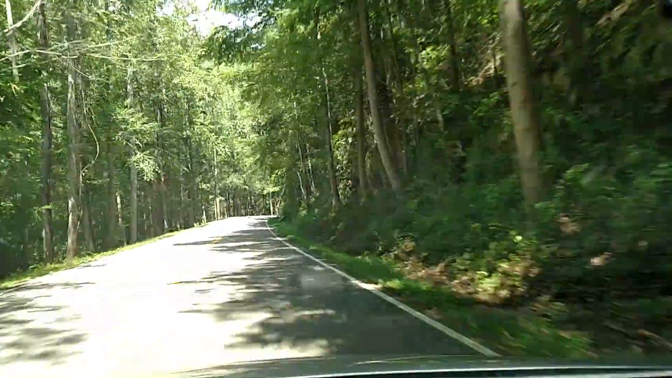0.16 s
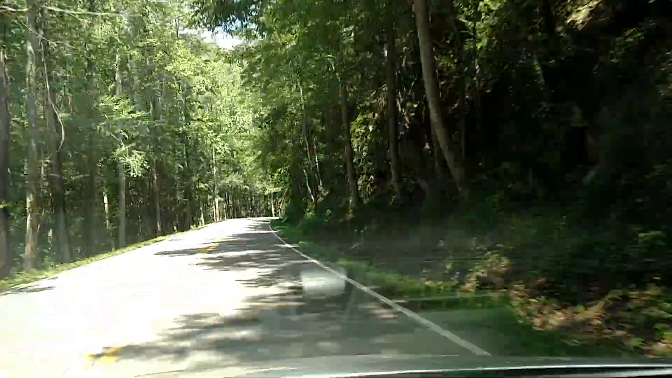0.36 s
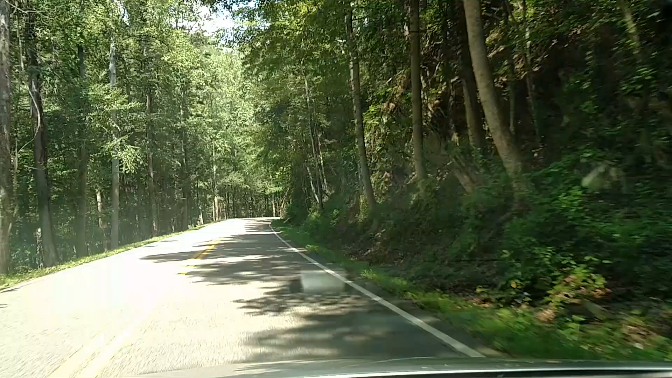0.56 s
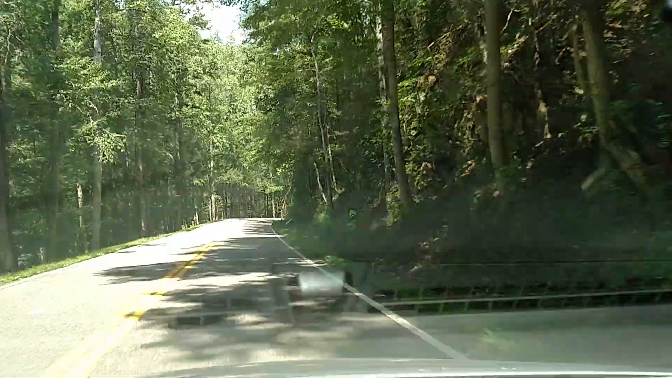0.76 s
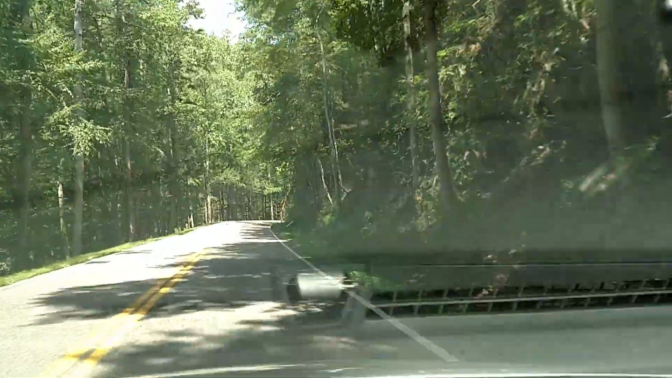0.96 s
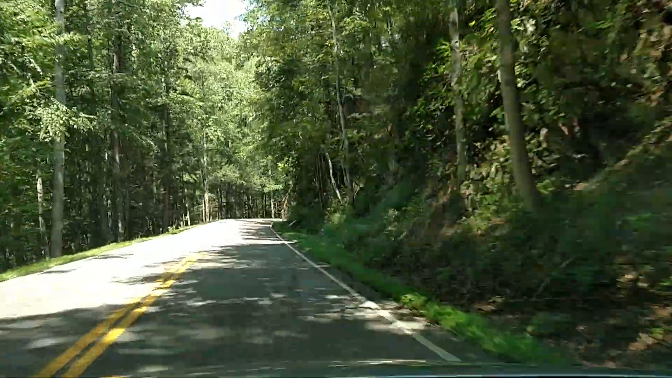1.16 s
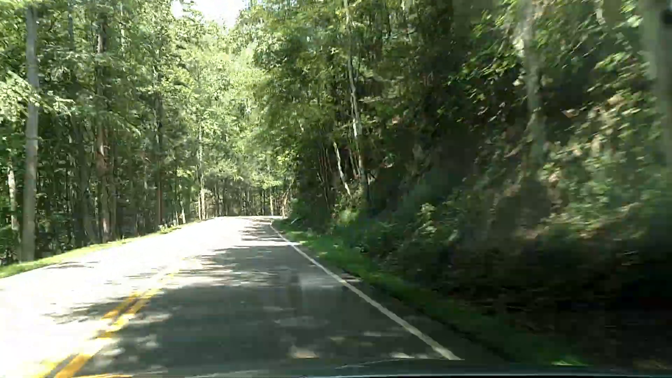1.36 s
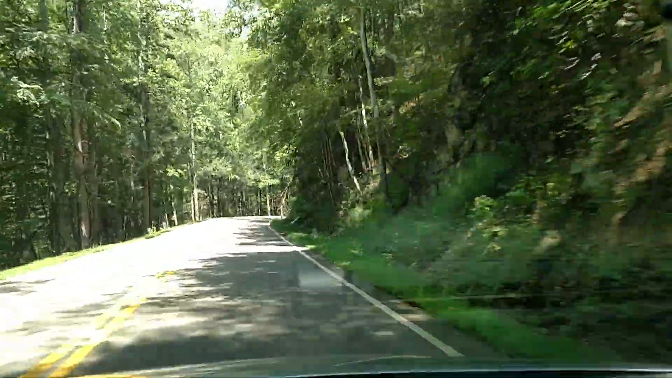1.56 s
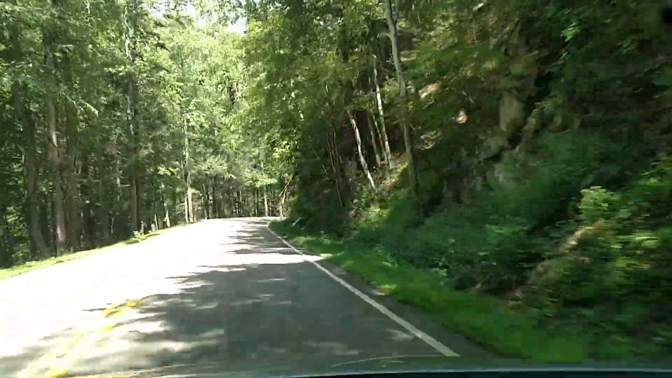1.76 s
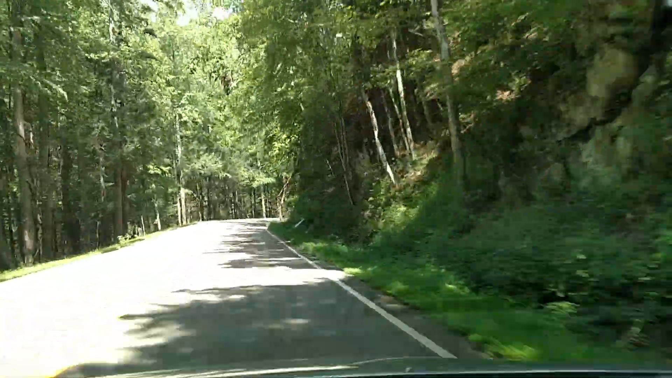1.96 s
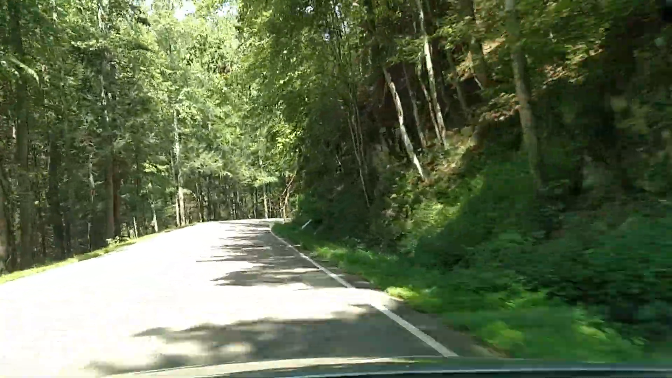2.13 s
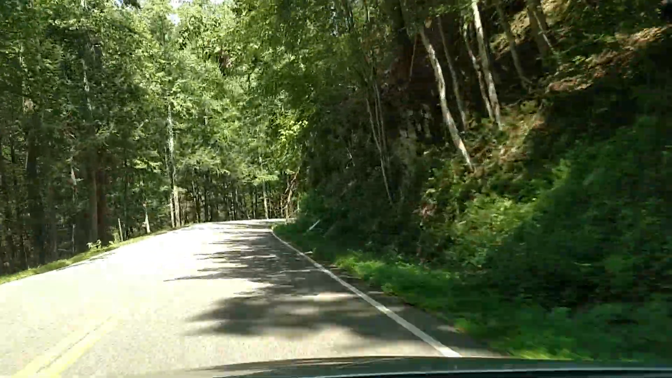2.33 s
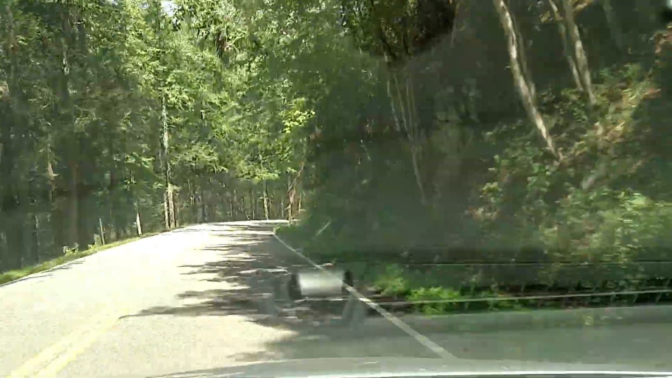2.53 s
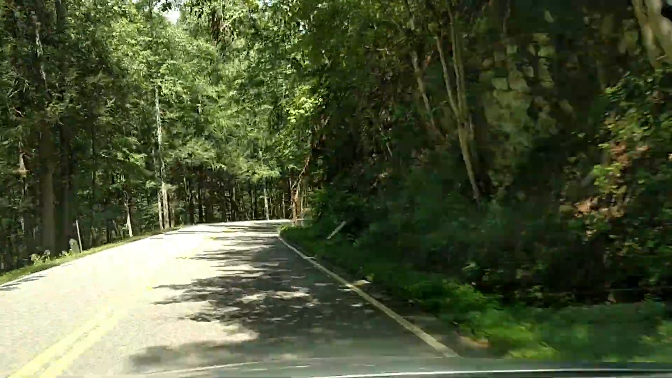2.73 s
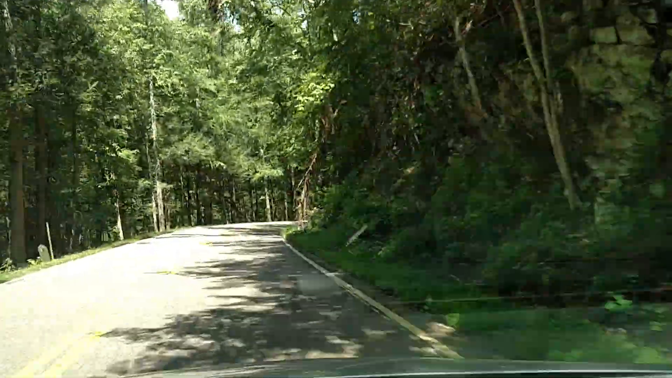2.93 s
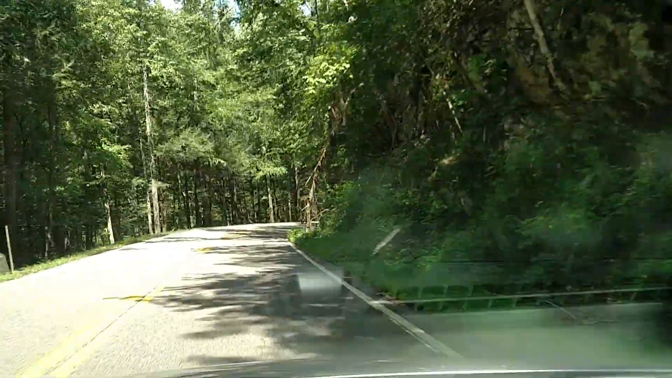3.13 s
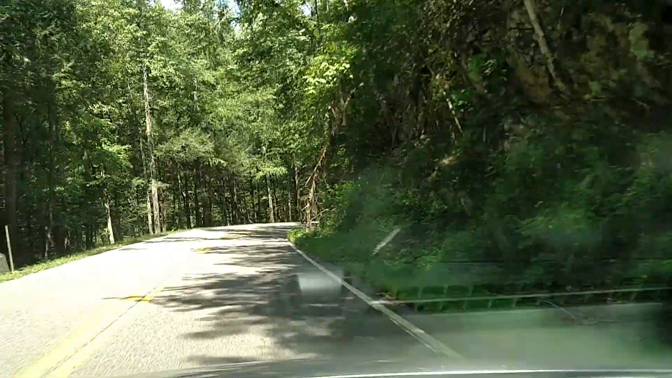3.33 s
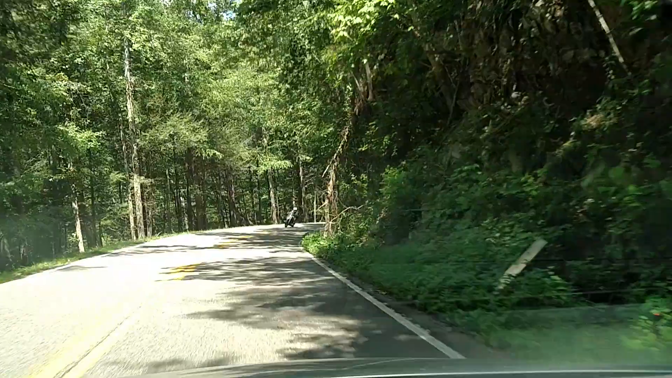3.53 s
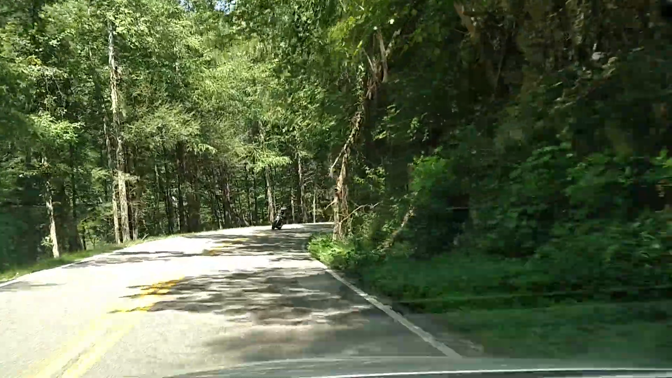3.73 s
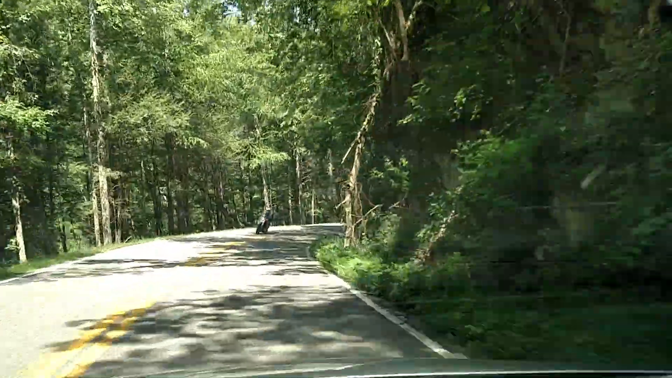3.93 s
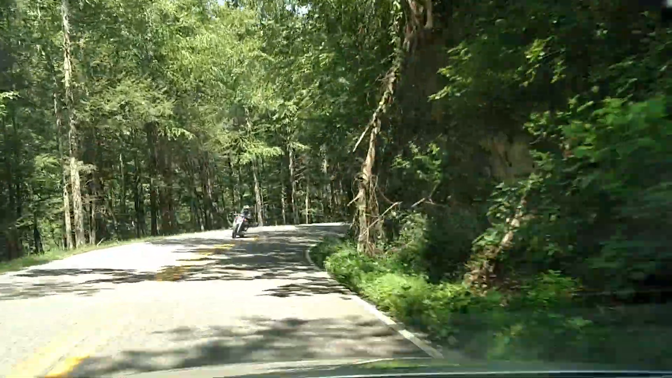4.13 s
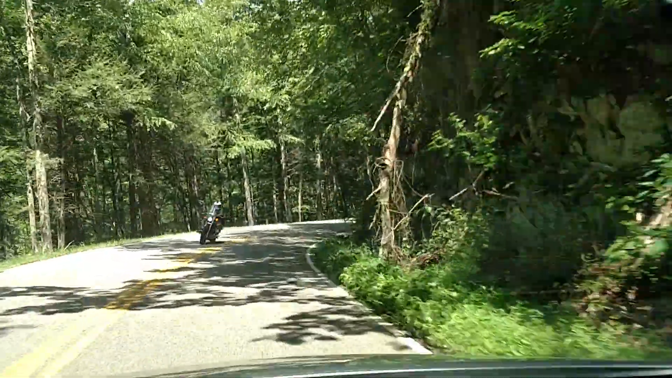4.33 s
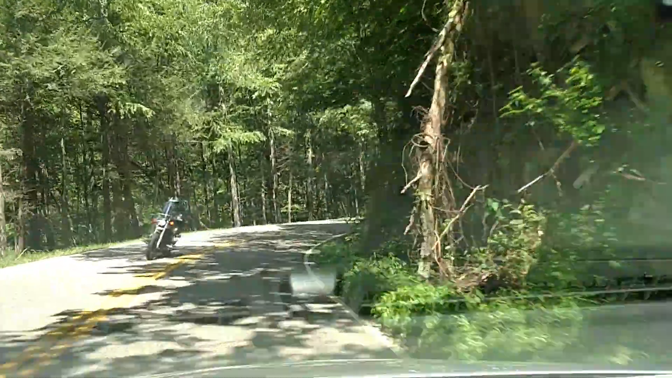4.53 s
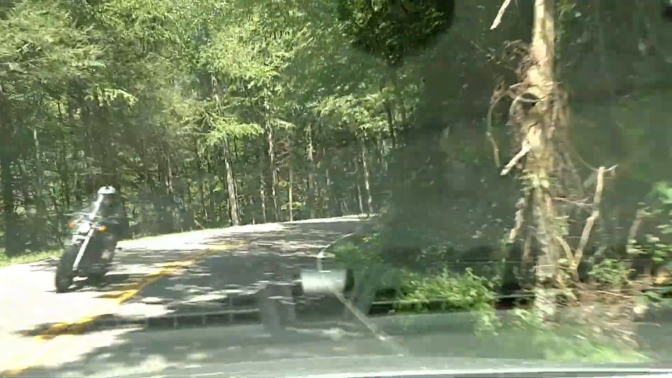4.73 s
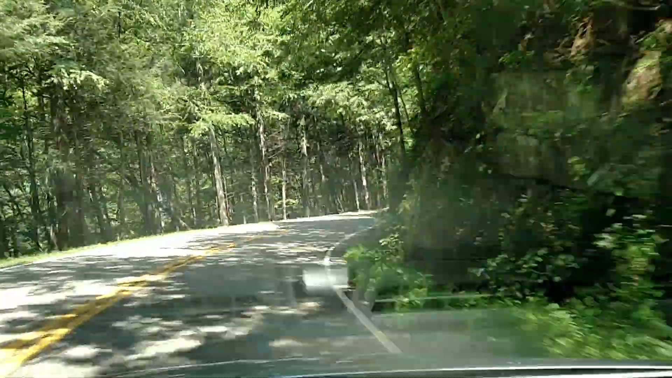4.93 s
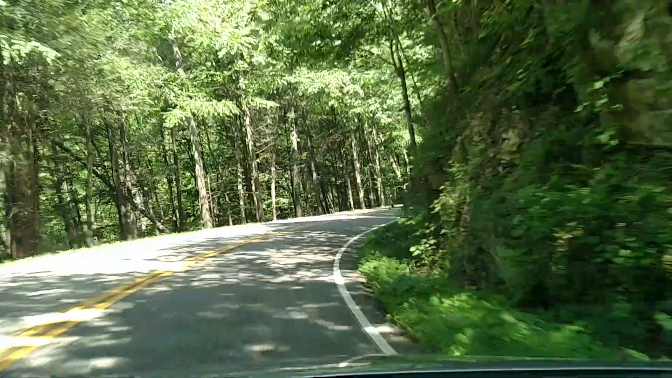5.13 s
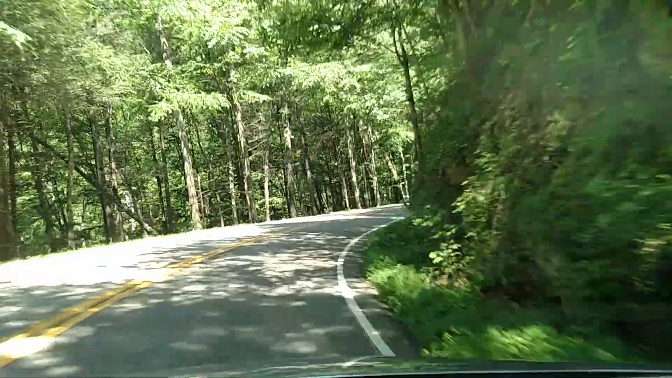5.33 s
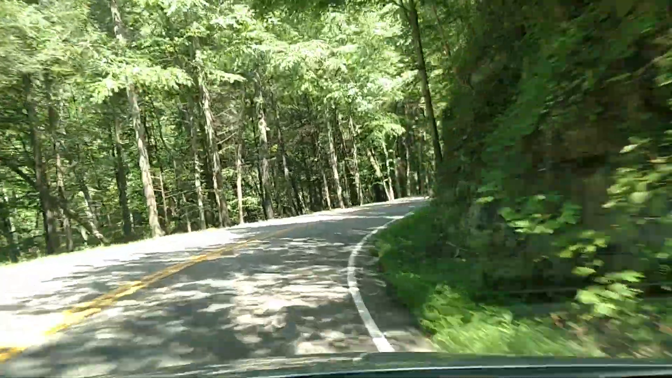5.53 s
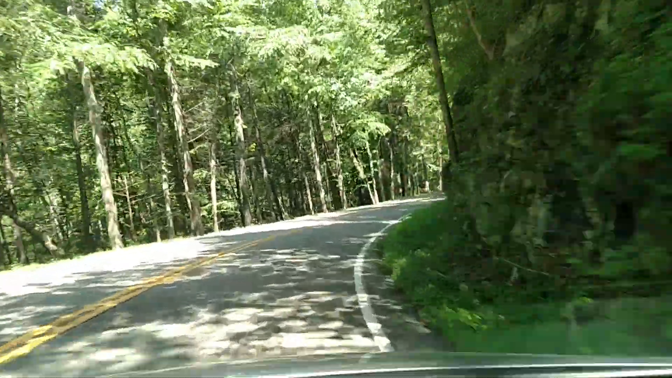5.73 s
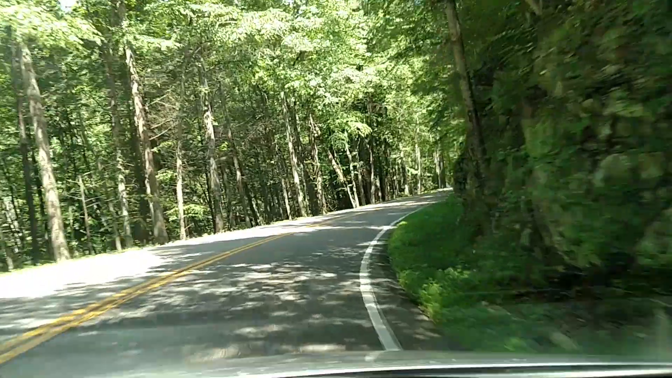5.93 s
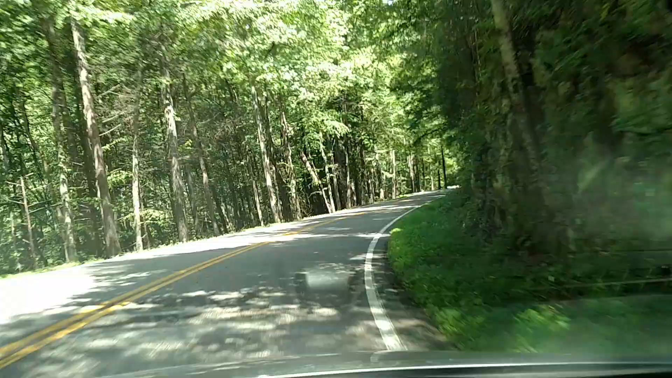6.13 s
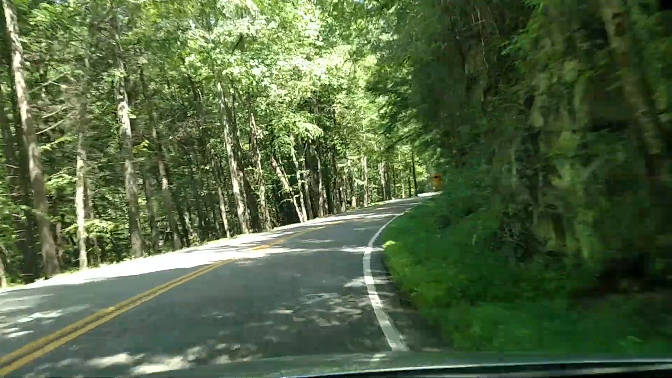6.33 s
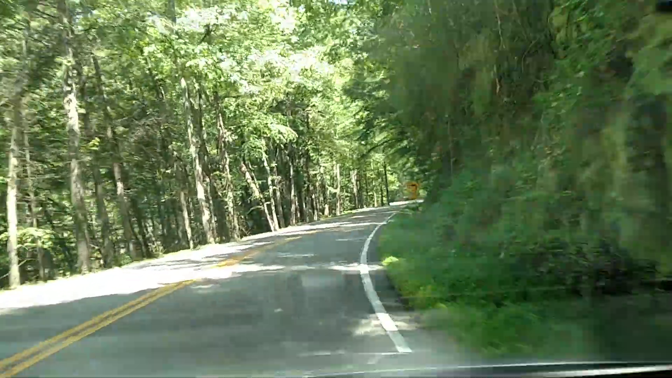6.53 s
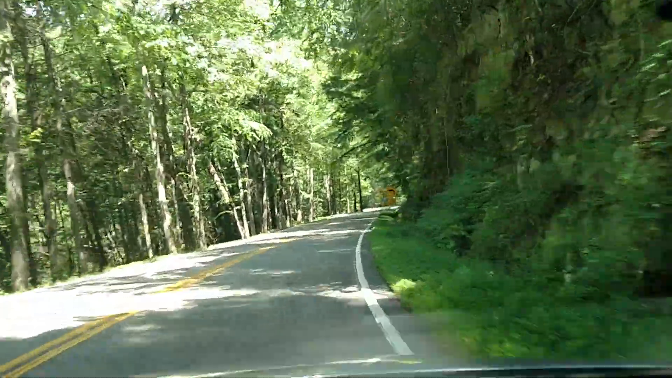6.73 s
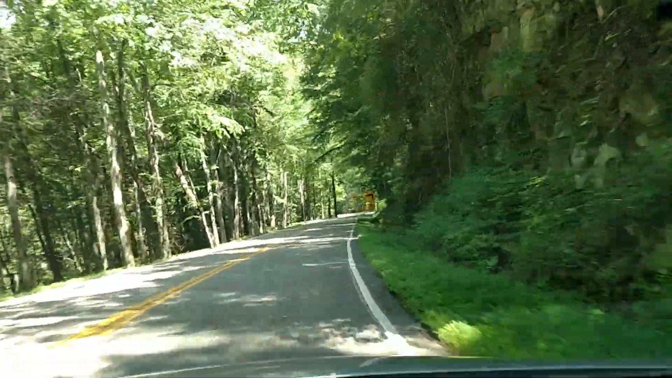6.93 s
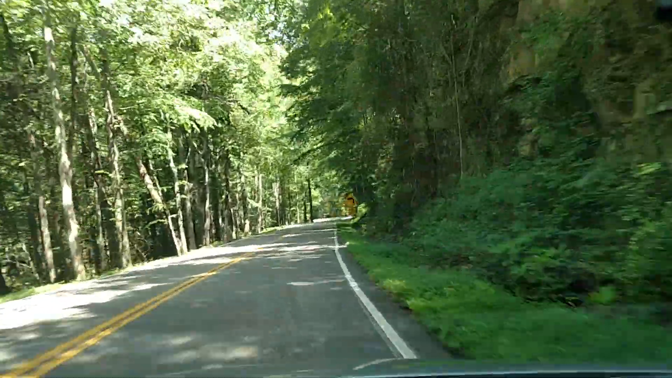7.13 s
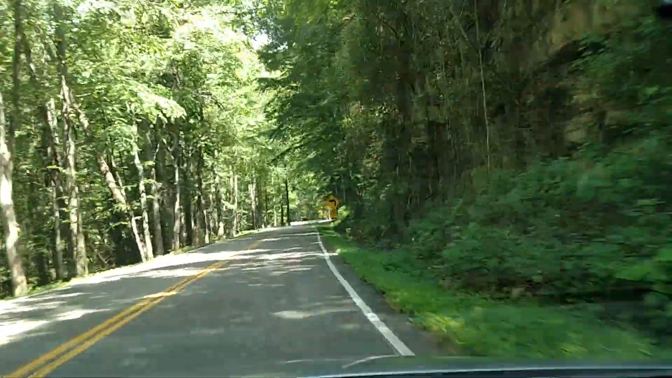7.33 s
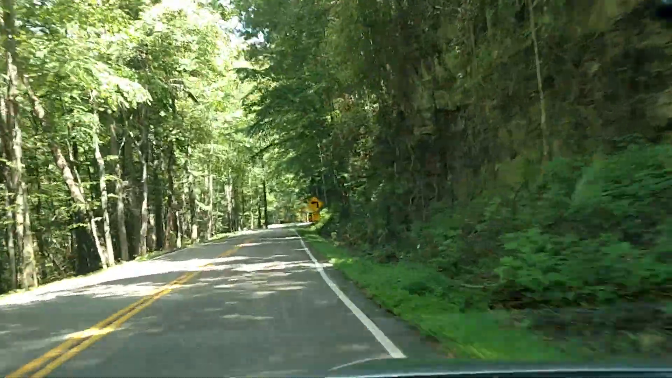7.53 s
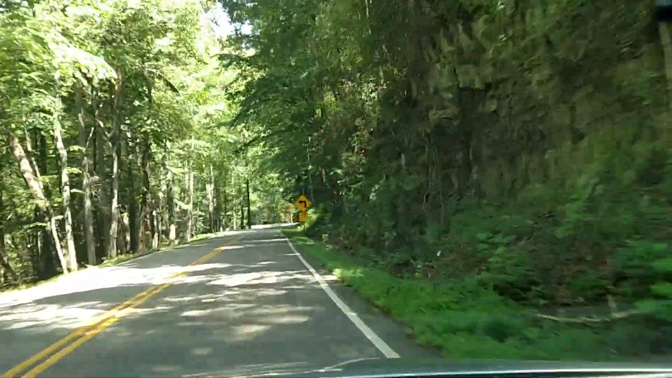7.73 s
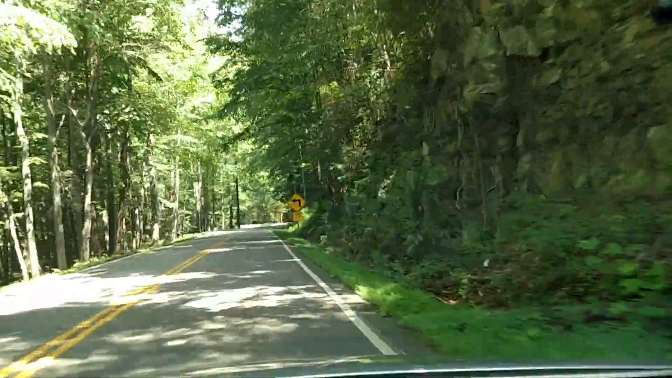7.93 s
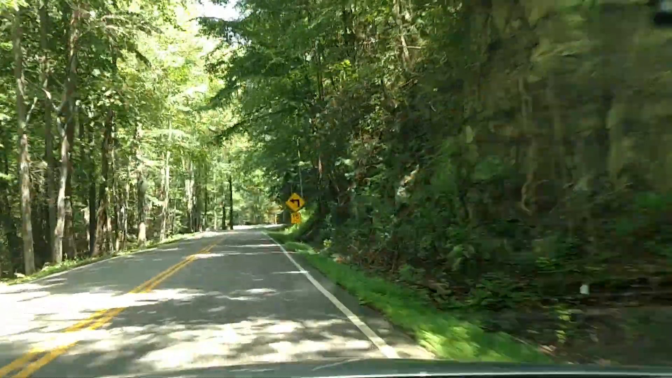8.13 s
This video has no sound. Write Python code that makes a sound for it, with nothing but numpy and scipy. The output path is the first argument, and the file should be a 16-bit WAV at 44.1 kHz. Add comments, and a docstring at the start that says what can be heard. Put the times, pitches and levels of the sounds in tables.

```python
"""A twin-cylinder motorcycle booms ahead, then barks past a car window with falling pitch on a winding road.
Its exhaust is a sum of cycle-rate orders plus ringing blasts; noise makes its whoosh and escaping gas.
Inside the car, a firing tone drones in the cabin, and shaped noises make road rumble, tyre roar and rushing air.
A limiter turns the gain down at loud peaks, so the road noise sinks and then swells back."""
import sys
import numpy as np
from scipy import signal
from scipy.fft import rfft, irfft
from scipy.io import wavfile
from scipy.ndimage import uniform_filter1d, minimum_filter1d

SR = 44100
rng = np.random.default_rng(int(sys.argv[2]) if len(sys.argv) > 2 else 0)


def bounce(signal):
    """Save signal as a 16-bit WAV file at the path given by the first command-line argument."""
    frames = np.transpose(np.atleast_2d(signal))
    limited = np.clip(frames, -1, 1)
    pcm = np.round(limited * 32767).astype(np.int16)
    wavfile.write(sys.argv[1], SR, pcm)


N = 360291
TIME = np.arange(N) / SR  # s

# path: closing speed m/s, least gap m, moment of meeting s
CLOSING, GAP, MEETING = 23, 1.5, 5.135
# moment of one firing s, lag of the second cylinder in cycles
FIRING, SECOND_CYLINDER = 5.1432, .415
SOUND_SPEED = 343  # m/s

# four-stroke cycle rate of the motorcycle: t/s, f/Hz
CYCLE_RATE = [(3.5, 20.2), (4.44, 20.62), (4.8, 20.95), (5, 21.12), (5.3, 21.05), (6.5, 21)]


def cycles_heard():
    """Doppler effect: a changing travel time lowers the cycle rate heard as the motorcycle passes."""
    rate_hz, = follow(CYCLE_RATE)
    cycles = np.cumsum(rate_hz) / SR
    cycles -= np.interp(FIRING, TIME, cycles)
    arrival = TIME + distance() / SOUND_SPEED
    return np.interp(TIME, arrival, cycles)


# exhaust boom heard from ahead: multiple of the cycle rate, relative level/dB
AHEAD_ORDERS = [(4, -20), (5, -13), (6, 0), (7, -12), (9, -29), (11, -23), (15, -22), (16, -28), (17, -21),
                (20, -35)]
# exhaust boom heard from behind: multiple of the cycle rate, relative level/dB
BEHIND_ORDERS = [(5, -4.5), (6, -2), (7, -6), (9, -8.5), (10, -5.5), (11, -0.5), (12, -4), (14, -5),
                 (15, -15)]
# radiation of each boom: level/dB at the gap on the beam axis, power of the fall with distance, power of the beam
AHEAD_RADIATION = (-0.7, .68, .7)
BEHIND_RADIATION = (-8.5, 0.55, 1.8)


def motorcycle_boom(cycles, orders, gain, rough, fading_db):
    """Harmonic synthesis: uneven combustion roughens the exhaust orders and reflections fade each separately."""
    cycles = cycles + .002 * wander(rate_hz=15)
    tone = 0
    for order, db in orders:
        level = gain_of(db + fading_db * wander(rate_hz=4.2))
        tone = tone + level * np.cos(2 * np.pi * (order * cycles + rng.random()))
    combustion = 1 + rough * wander(rate_hz=25)
    return evened(tone) * combustion * gain


# ring of pipes and cabin after each blast: f/Hz, width/Hz, relative level/dB
PIPE_MODES = [(139, 26, -3), (206, 45, 1), (238.2, 38, 2.5), (342, 37, -2.5), (392, 55, -6.5),
              (620, 130, -12.5), (683, 33, -19), (880, 33, -23.5), (1095, 110, -21)]
# radiation of the blasts: level/dB at the gap on the beam axis, power of the fall with distance, power of the beam
BARK_RADIATION = (9.7, 1.2, .75)
# this far behind, the car's own body screens the pipes: distance m, softness m, drop dB
SCREEN_M, SCREEN_EDGE_M, SCREEN_DB = 5, .5, -16


def motorcycle_bark(cycles, uneven_db=1.2, muffle_hz=1500, thump=1.0, thump_hz=210):
    """Impulse response: two unevenly spaced firings a cycle each set off a pressure thump and damped modes."""
    fired = 0
    for count in (cycles, cycles - SECOND_CYLINDER):
        whole = np.floor(count)
        fired = fired + np.diff(whole, prepend=whole[0])  # one impulse per completed cycle
    screened_db = SCREEN_DB * beyond(past(), SCREEN_M, SCREEN_EDGE_M)
    blast_db = screened_db + uneven_db * rng.standard_normal(N)
    fired = fired * carried(BARK_RADIATION, backwards=True) * gain_of(blast_db)

    t = TIME[:SR // 10]
    ring = 0
    for k, (hz, width, db) in enumerate(PIPE_MODES):
        decay = np.exp(-np.pi * width * t)
        ring = ring + (-1) ** k * gain_of(db) * decay * np.sin(2 * np.pi * hz * t)
    ring = signal.sosfilt(signal.butter(2, muffle_hz, fs=SR, output="sos"), ring)
    u = np.pi * (thump_hz * t - 1)
    pressure = (2 * u ** 2 - 1) * np.exp(-u ** 2)
    blast = ring / abs(ring).max() + thump * pressure
    return signal.oaconvolve(fired, blast / abs(blast).max())[:N]


def cabin_echo(x, share=0.53, t60=0.18):
    """Reverberation: glass and trim return sparse reflections that fall by 60 dB in t60 seconds."""
    t = TIME[:SR // 5]
    struck = rng.random(len(t)) < 2000 / SR  # about 2000 reflections a second
    taps = rng.standard_normal(len(t)) * struck * (t > .003) * gain_of(-60 * t / t60)
    return x + share * signal.oaconvolve(x, taps / np.linalg.norm(taps))[:N]


# spectrum of the escaping gas: f/Hz, relative level/dB per Hz
GAS_SPECTRUM = [(600, -11.5), (1300, 3), (2600, -5), (3700, 1.5), (4700, -1.5), (5700, 0.5), (6200, -3.5),
                (7000, 2.5), (8200, -6.5), (10000, -13.5), (15000, -22)]
# cracks of the closest blasts: t/s, level/dB, resonance f/Hz
GAS_CRACKS = [(5.102, -38.5, 6450), (5.123, -40, 2400), (5.1482, -32, 5960), (5.166, -32.5, 5070),
              (5.197, -28.5, 3850), (5.216, -28, 7000), (5.267, -39.5, 5600), (5.3182, -40.5, 5500)]


def motorcycle_cracks(rise_s=0.0013, whistle=0.95, width_hz=600):
    """Jet noise: millisecond puffs of turbulent gas, each exciting a brief resonance at its own pitch."""
    jet, out = noise(GAS_SPECTRUM), np.zeros(N)
    t = TIME[:SR // 20]
    envelope = t / rise_s * np.exp(1 - t / rise_s)
    for s, db, hz in GAS_CRACKS:
        start = round(s * SR)
        span = slice(start, start + len(t))
        puff = jet[span] * envelope
        ringing = signal.lfilter(*signal.iirpeak(hz, hz / width_hz, SR), puff)
        out[span] += gain_of(db) * (puff + whistle * ringing)
    return out


# motorcycle's tyres, chain and wind: f/Hz, relative level/dB per Hz
WHOOSH_SPECTRUM = [(300, 10), (700, 12), (1150, 1), (1500, -4.5), (2400, -7.5), (3500, -16.5),
                   (5500, -20.5), (7200, -19.5), (10000, -35), (15000, -43.5)]


def motorcycle_whoosh(cycles, level_db=-27, falloff=1.2, rasp=0.18):
    """Amplitude modulation: running noise rasps once a crank turn and obeys a power law of distance."""
    throb = 1 + rasp * np.cos(4 * np.pi * cycles - 1)  # two crank turns a cycle
    return noise(WHOOSH_SPECTRUM) * throb * gain_of(level_db) * (GAP / distance()) ** falloff


def past():
    """Uniform motion: metres the motorcycle has passed the car by, negative on approach."""
    return CLOSING * (TIME - MEETING)


def distance():
    """Right-angled geometry: metres between the motorcycle and the car."""
    return np.hypot(GAP, past())


# the bend hides the motorcycle beyond a sight line: a quick drop, then more with every metre
SIGHT_M, SIGHT_EDGE_M, HIDDEN_DB, HIDDEN_DB_PER_M = 17, 0.47, -6, -0.2985


def carried(radiation, backwards):
    """Directivity and spreading: gain by angle and distance, with the acoustic shadow of the bend."""
    level_db, spread, beam = radiation
    metres = distance()
    along = past() if backwards else -past()
    facing = .5 + .5 * along / metres  # 1 on the beam axis, 0 opposite
    hidden_m = np.maximum(metres - SIGHT_M, 0)
    shadow_db = HIDDEN_DB * beyond(metres, SIGHT_M, SIGHT_EDGE_M) + HIDDEN_DB_PER_M * hidden_m
    return gain_of(level_db + shadow_db) * (GAP / metres) ** spread * facing ** beam


# the car's firing rate, sagging as the throttle eases: t/s, f/Hz
FIRING_RATE = [(0, 107.3), (.17, 109.7), (.7, 108), (1.6, 106.9), (2.3, 105.3), (2.9, 101), (3.4, 98.6),
               (4.25, 90.33), (4.8, 86.5)]
# the cabin booms when the firing rate is near its resonance
CABIN_HZ, CABIN_WIDTH_HZ, RESONANT_DB, OFF_RESONANCE_DB = 108.74, 3.5, -15.5, -26
# the drone dies away late in the bend: moment, softness, drop
FADE_S, FADE_EDGE_S, FADE_DB = 6.95, 0.11, -12.5


def car_engine(second_db=-21, third_db=-26, waver_db=1.5):
    """Forced resonance: the firing tone and faint overtones weaken as it slides off the cabin mode."""
    hz, = follow(FIRING_RATE)
    wavering_hz = hz * (1 + 0.0041 * wander(rate_hz=5.1))
    angle = 2 * np.pi * np.cumsum(wavering_hz) / SR
    tone = np.sin(angle) + gain_of(second_db) * np.sin(2 * angle) + gain_of(third_db) * np.sin(3 * angle)
    resonant = gain_of(RESONANT_DB) / np.hypot(1, 2 * (hz - CABIN_HZ) / CABIN_WIDTH_HZ)
    boom = np.hypot(resonant, gain_of(OFF_RESONANCE_DB))
    fade = gain_of(FADE_DB * beyond(TIME, FADE_S, FADE_EDGE_S))
    return evened(tone) * boom * fade * gain_of(waver_db * wander(rate_hz=3.5))


# shaking body, drumming cabin, roaring tread: f/Hz, relative level/dB per Hz
SHAKE_SPECTRUM = [(4, -16), (10, -6), (18, -6), (25, -1), (31, 1), (42, -2), (55, -8), (80, -14),
                  (130, -35)]
DRUM_SPECTRUM = [(50, -24), (72, -3.5), (92, -3.5), (108, 4), (125, 4), (150, -0.5), (166, -7.5),
                 (186, 1.5), (212, -6.5), (245, -6), (285, -10), (340, -11), (430, -17), (520, -18),
                 (680, -29), (1000, -42.5)]
ROAR_SPECTRUM = [(300, -23.5), (520, -6.5), (650, -11.5), (760, -10.5), (850, -11), (1170, -11.5),
                 (1450, -21), (2000, -28), (3000, -40), (4000, -45.5), (5300, -52), (7000, -47.5),
                 (9000, -57), (15000, -71)]
# stretches of coarse asphalt: t/s, length/s, extra level/dB
COARSE_STRETCHES = [(.11, 0.1, 2), (1.226, 0.2, 2.5), (1.564, .12, 4.5), (2.843, 0.16, 3),
                    (3.904, 0.091, 2), (6.68, 0.094, 2), (7.04, 0.15, 1.5)]
# levels on the straight
SHAKE_DB, DRUM_DB, ROAR_DB = -20, -20.5, -41.5
# entering the bend, the body shakes less and the loaded tyres boom
BEND_S, BEND_EDGE_S, BEND_SHAKE_DB, TYRE_BOOM_DB = 3.5, 0.2, -2.5, -24
# the tyres work harder through the curve, most at its apex
APEX_S, LOAD_RISE_S, LOAD_FALL_S, LOAD_DRUM_DB, LOAD_ROAR_DB = 6.95, 1.0, .7, 3, 7.5


def road(grain_db=1.0, drift_db=.5):
    """Random excitation: asphalt shakes the body, drums in the cabin and roars under the loaded tread."""
    bend = beyond(TIME, BEND_S, BEND_EDGE_S)
    load = np.exp(-np.maximum((APEX_S - TIME) / LOAD_RISE_S, (TIME - APEX_S) / LOAD_FALL_S))
    # one surface reaches cabin and tread together
    surface_db = grain_db * wander(rate_hz=49) + drift_db * wander(rate_hz=5)
    for s, length, db in COARSE_STRETCHES:
        surface_db = surface_db + db * np.exp(-(2 * (TIME - s) / length) ** 2)
    shaking = noise(SHAKE_SPECTRUM) * gain_of(SHAKE_DB + BEND_SHAKE_DB * bend)
    booming = tyre_boom() * bend * gain_of(TYRE_BOOM_DB)
    drumming = noise(DRUM_SPECTRUM) * gain_of(DRUM_DB + LOAD_DRUM_DB * load + surface_db)
    roaring = noise(ROAR_SPECTRUM) * gain_of(ROAR_DB + LOAD_ROAR_DB * load + surface_db)
    return shaking + booming + drumming + roaring


# resonances of the loaded tyres: f/Hz, width/Hz, relative level/dB
LOADED_TYRE_MODES = [(123.3, 14, -0.5), (180.6, 6.6, -0.5)]


def tyre_boom():
    """Modal resonance: asphalt noise excites the low modes of tyres and suspension."""
    bumps = noise(DRUM_SPECTRUM)
    boom = 0
    for hz, width, db in LOADED_TYRE_MODES:
        boom = boom + gain_of(db) * signal.lfilter(*signal.iirpeak(hz, hz / width, SR), bumps)
    return evened(boom)


# air rushing along the side of the car: t/s, level/dB
AIR_LEVEL = [(2.4, -69.5), (3.5, -66.5), (4.6, -58.5), (5.9, -57), (6.25, -56), (7.1, -57), (7.35, -67)]
# spectrum of that air: f/Hz, relative level/dB per Hz
AIR_SPECTRUM = [(300, -16), (900, 2), (1900, 5), (3000, -5.5), (4500, -4.5), (7000, -9.5), (8500, -18.5),
                (10500, -21.5), (15500, -24)]


def air(flutter_db=2.2):
    """Turbulence: broadband hiss along the side of the car, with a fluttering level."""
    level_db, = follow(AIR_LEVEL)
    return noise(AIR_SPECTRUM) * gain_of(level_db + flutter_db * wander(rate_hz=22))


def gain_of(db):
    """Decibel law: level to amplitude ratio."""
    return 10 ** (np.asarray(db) / 20)


def evened(x):
    """Normalisation: scales a signal to rms 1."""
    return x / np.sqrt(np.mean(x ** 2) + 1e-20)


def follow(rows):
    """Linear interpolation: each column of a time curve, at every sample."""
    s, *columns = np.transpose(rows)
    return [np.interp(TIME, s, c) for c in columns]


def beyond(value, limit, edge):
    """Sigmoid: a soft step from 0 to 1 as the limit is crossed."""
    return .5 + .5 * np.tanh((value - limit) / edge / 2)


def noise(spectrum):
    """Spectral shaping: random noise of rms 1, falling away beyond the ends of its spectrum."""
    hz = np.fft.rfftfreq(N, 1 / SR) + 1e-3  # keeps the logarithm finite
    f, db = np.transpose(spectrum)
    ends = np.minimum(hz / f[0], 1) ** 2 * np.minimum(f[-1] / hz, 1) ** 2
    shape = gain_of(np.interp(np.log(hz), np.log(f), db))
    return evened(irfft(rfft(rng.standard_normal(N)) * ends * shape, N))


def wander(rate_hz):
    """Gaussian low-pass: smooth random motion of rms 1, its spectrum weighted by 1/e at the rate."""
    hz = np.fft.rfftfreq(N, 1 / SR)
    return evened(irfft(rfft(rng.standard_normal(N)) * np.exp(-(hz / rate_hz) ** 2), N))


def scene():
    """Superposition: every source summed as it reaches the dashboard."""
    cycles = cycles_heard()
    ahead_gain = carried(AHEAD_RADIATION, backwards=False)
    behind_gain = carried(BEHIND_RADIATION, backwards=True)
    ahead = motorcycle_boom(cycles, AHEAD_ORDERS, ahead_gain, rough=.12, fading_db=.8)
    behind = motorcycle_boom(cycles, BEHIND_ORDERS, behind_gain, rough=0.38, fading_db=7.5)
    close_by = cabin_echo(motorcycle_bark(cycles)) + motorcycle_cracks() + motorcycle_whoosh(cycles)
    return (ahead + behind + close_by + car_engine() + road() + air())[None]


# the recorder's own hiss: f/Hz, relative level/dB per Hz
HISS_SPECTRUM = [(1000, 4), (7000, 4.5), (10000, -4), (15500, 1)]
EDGE_HZ = 15500  # upper band limit


def record(dry, ceiling_db=-0.23, hold_s=0.5, recovery_db=20, hiss_db=-78):
    """Peak limiting: gain drops at each peak, holds, then recovers; hiss, clipping and band limit follow."""
    over_db = np.maximum(20 * np.log10(abs(dry[0]) + 1e-9) - ceiling_db, 0)
    half = int(hold_s * SR / 2)
    held_db = -minimum_filter1d(-over_db, 2 * half + 1, origin=half, mode="constant")
    fall = recovery_db * TIME  # recovery_db is per second
    recovering_db = np.maximum.accumulate(held_db + fall) - fall
    cut_db = uniform_filter1d(recovering_db, size=130, origin=-55)  # mostly looks ahead
    hiss = gain_of(hiss_db) * noise(HISS_SPECTRUM)
    limited = np.clip(dry * gain_of(-cut_db) + hiss, -1, 1)
    limited = limited * signal.windows.tukey(N, .0004)  # very short fades at both ends
    lowpass = signal.firwin(511, EDGE_HZ, window=("kaiser", 9), fs=SR)
    return signal.oaconvolve(limited, lowpass[None], "same")


dry = scene()
out = record(dry)
bounce(out)
```